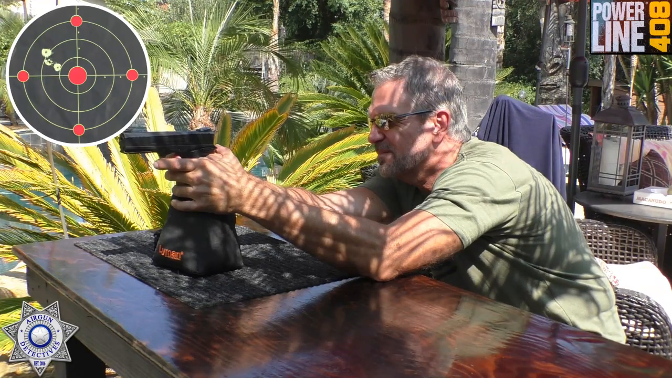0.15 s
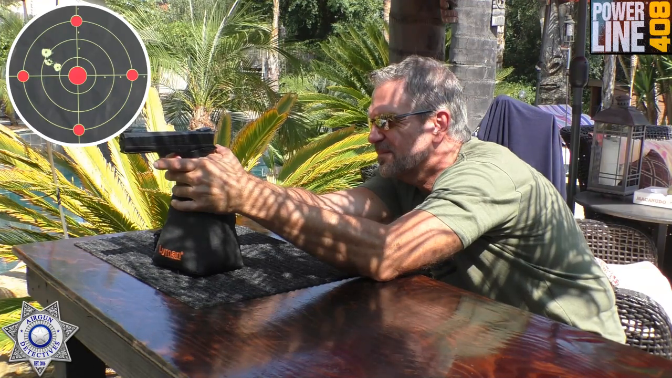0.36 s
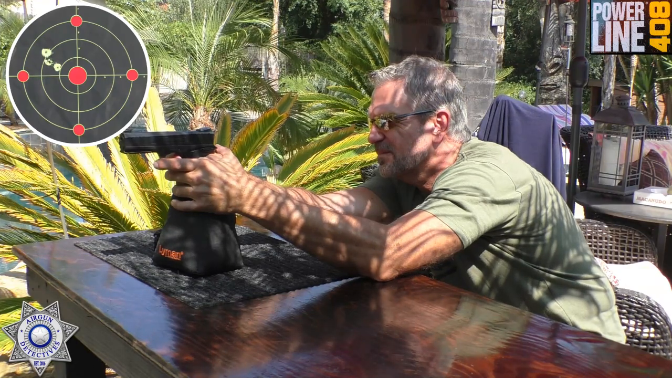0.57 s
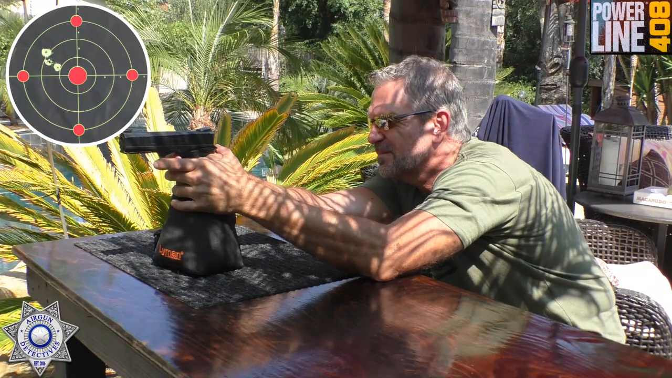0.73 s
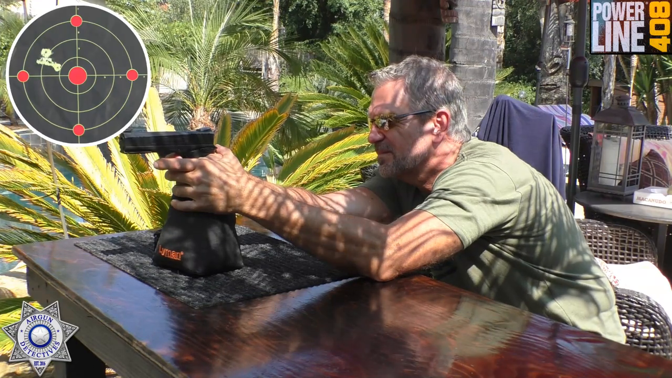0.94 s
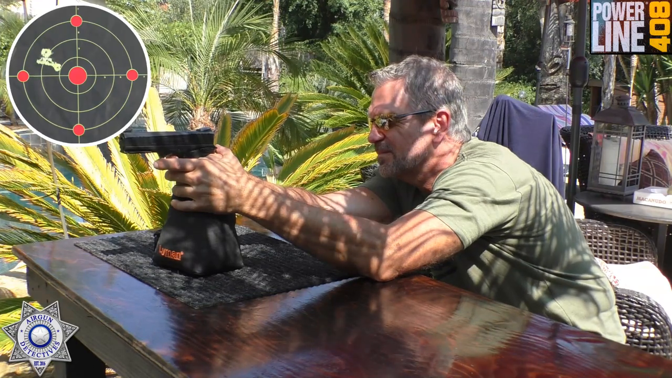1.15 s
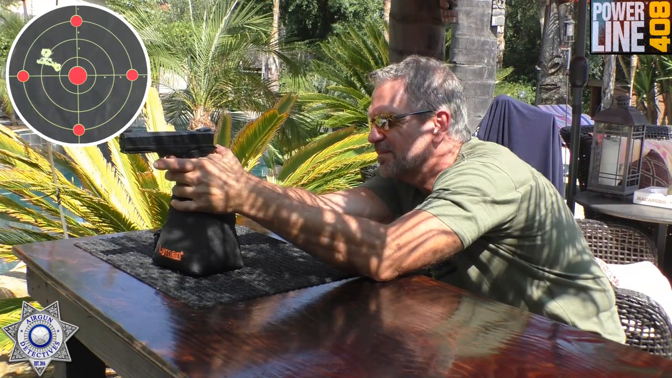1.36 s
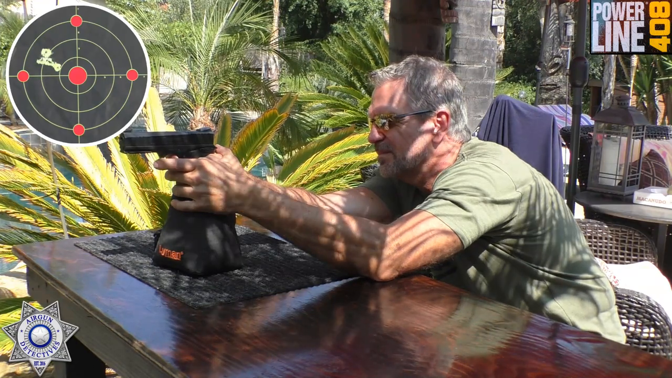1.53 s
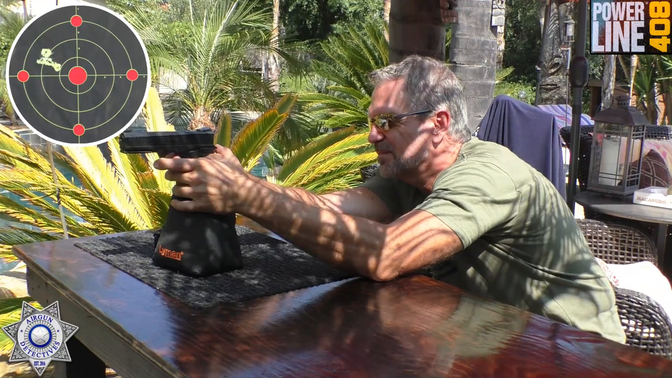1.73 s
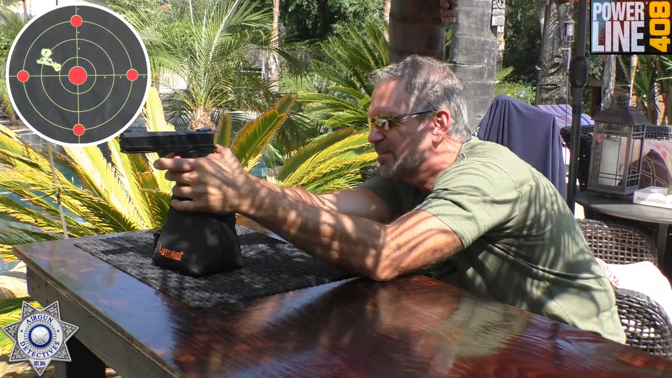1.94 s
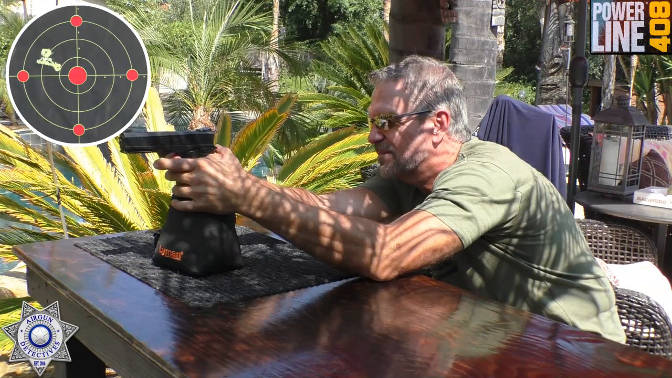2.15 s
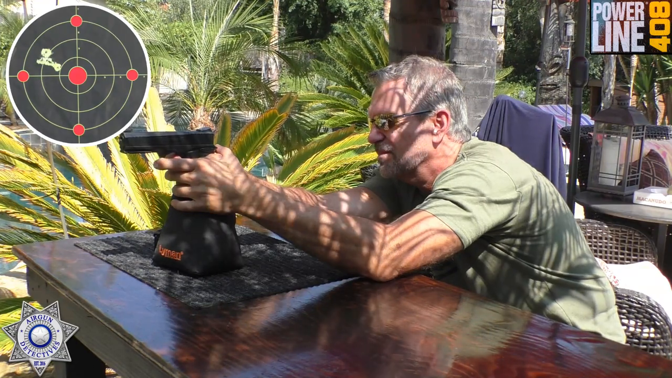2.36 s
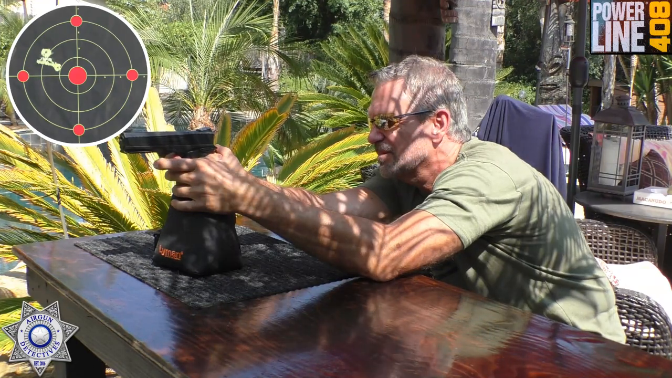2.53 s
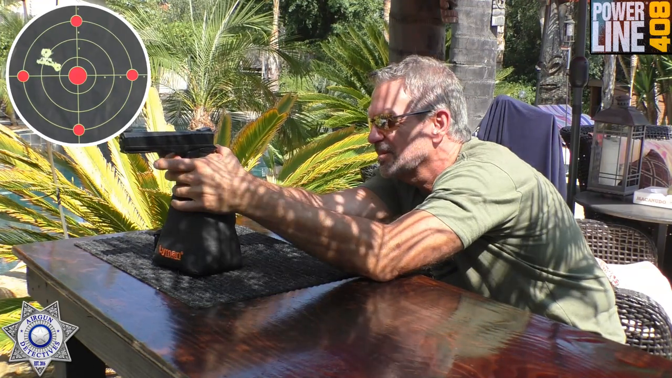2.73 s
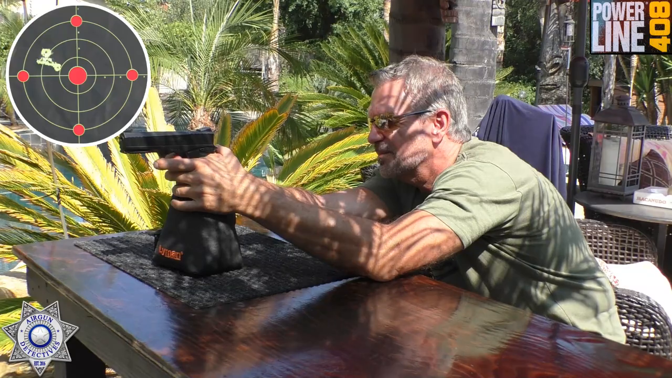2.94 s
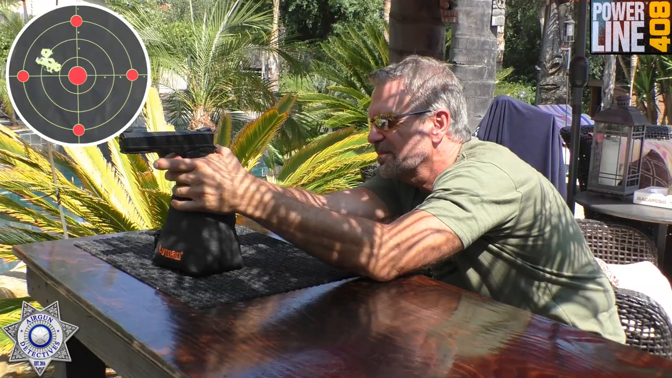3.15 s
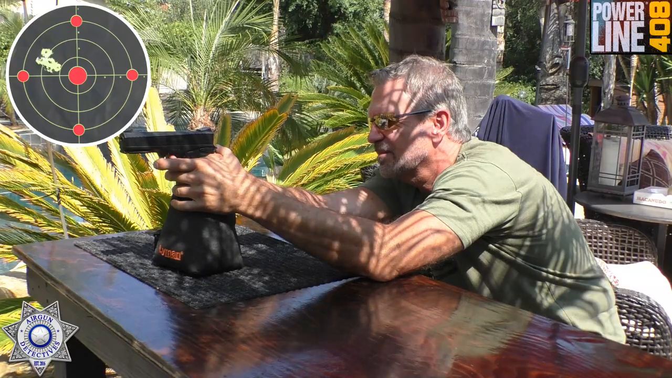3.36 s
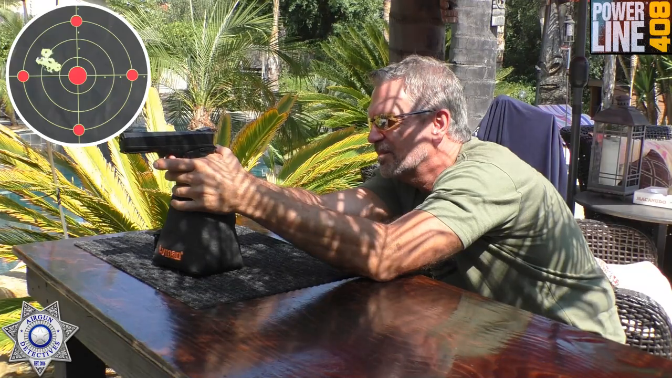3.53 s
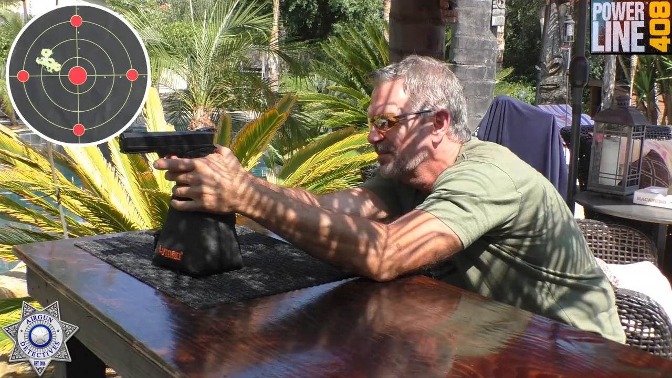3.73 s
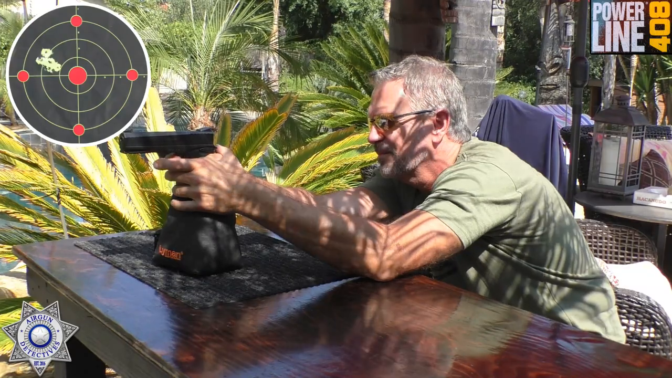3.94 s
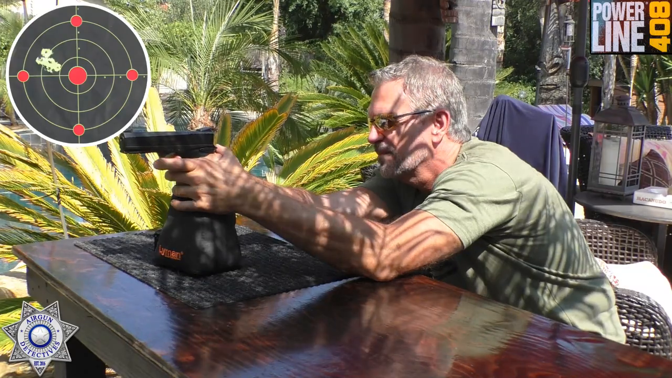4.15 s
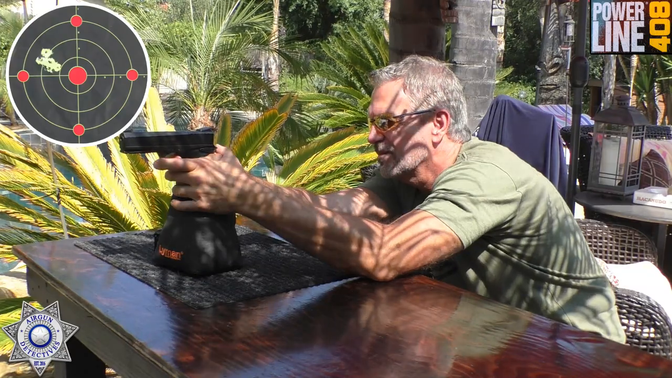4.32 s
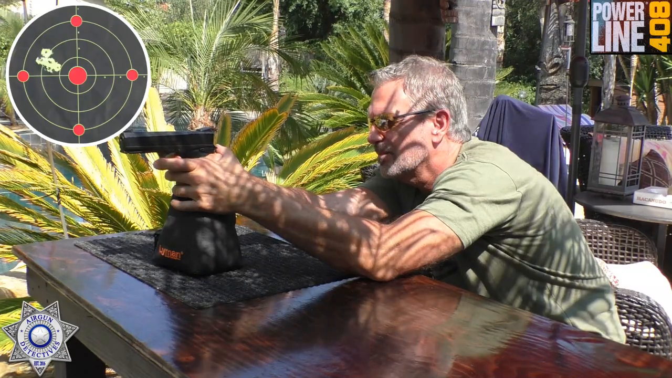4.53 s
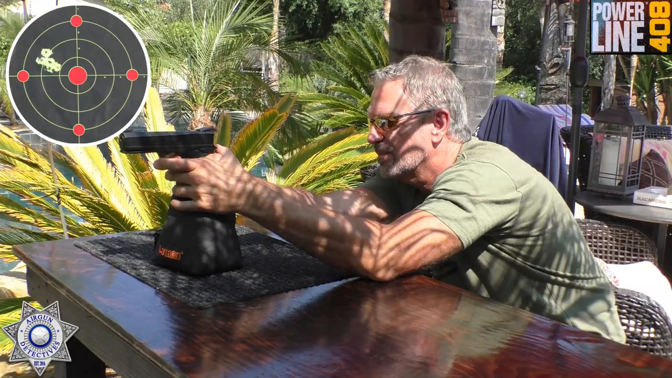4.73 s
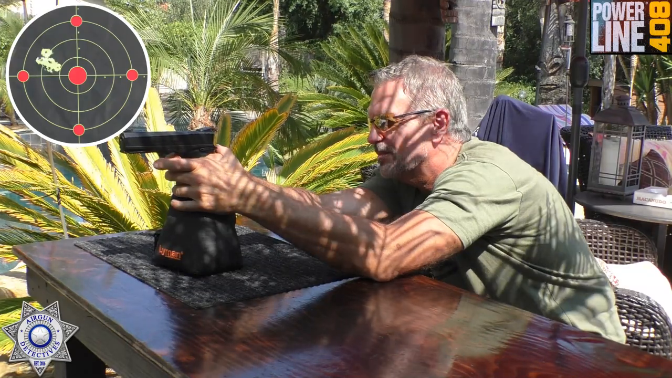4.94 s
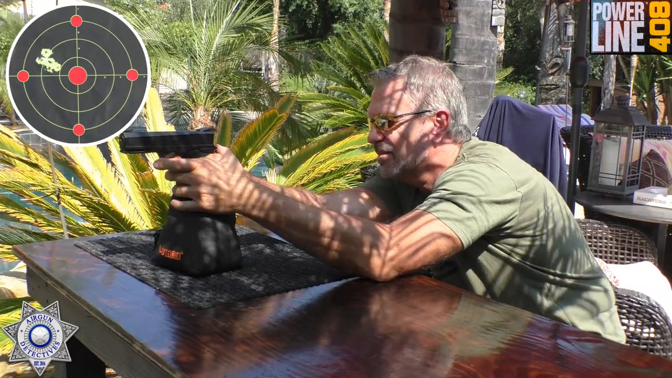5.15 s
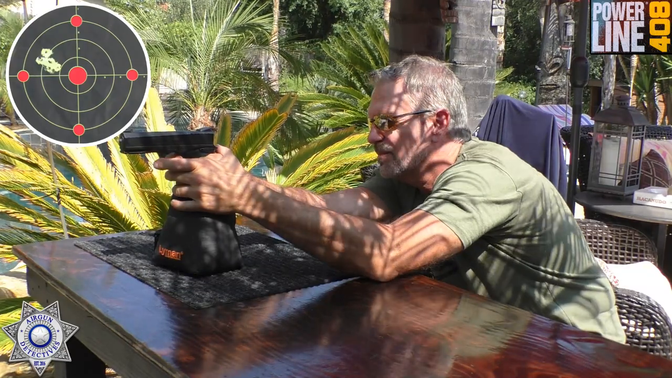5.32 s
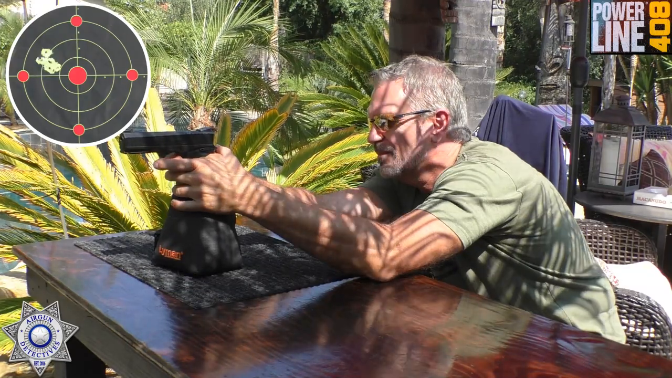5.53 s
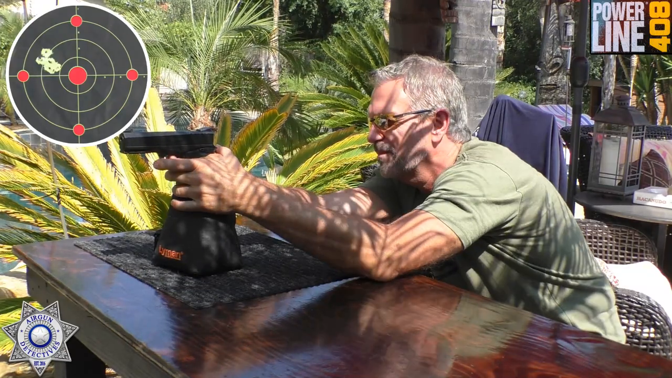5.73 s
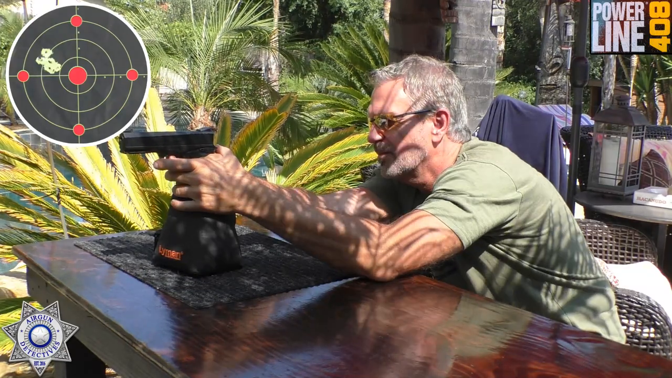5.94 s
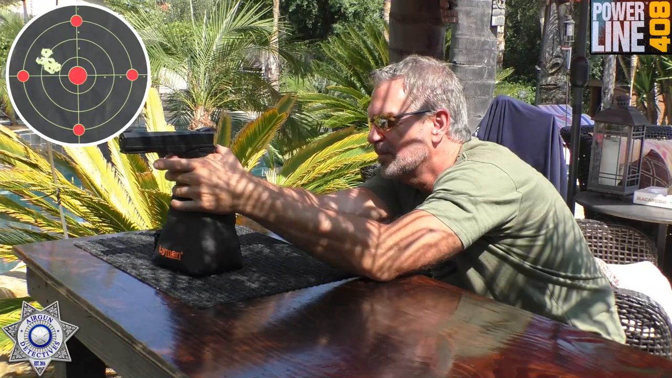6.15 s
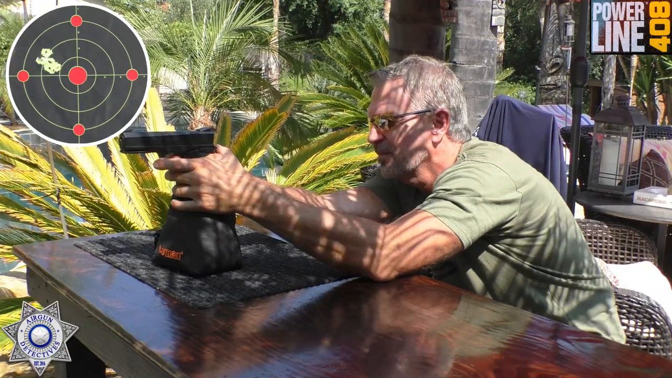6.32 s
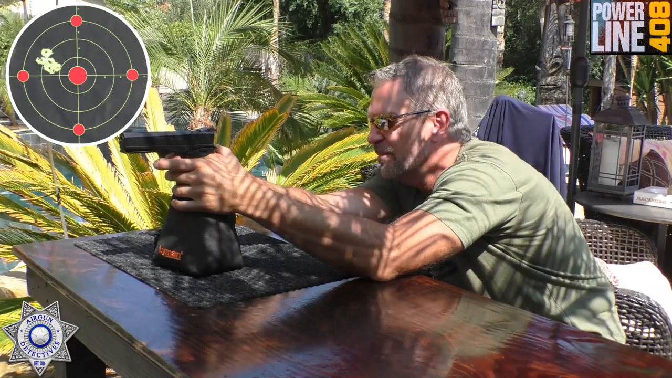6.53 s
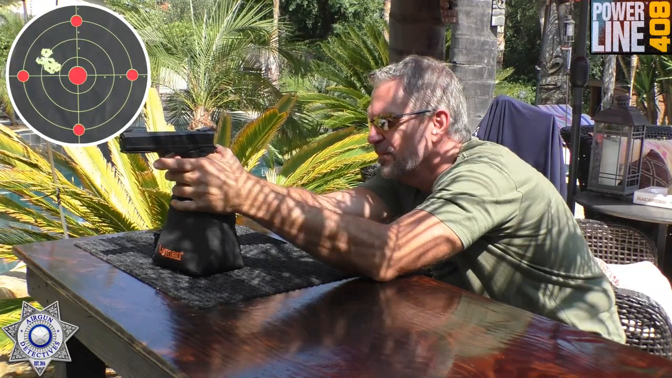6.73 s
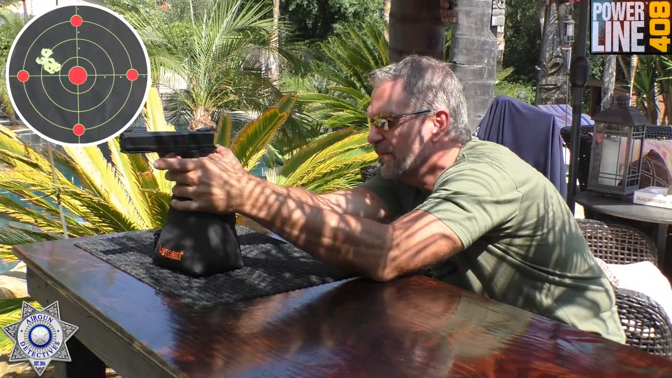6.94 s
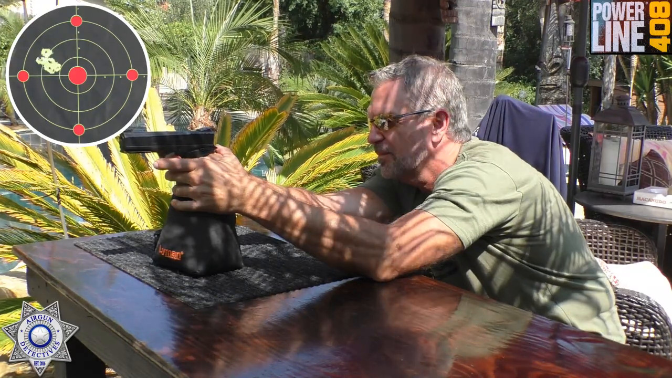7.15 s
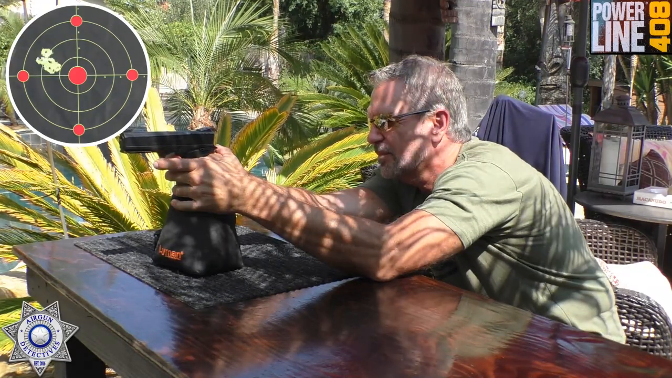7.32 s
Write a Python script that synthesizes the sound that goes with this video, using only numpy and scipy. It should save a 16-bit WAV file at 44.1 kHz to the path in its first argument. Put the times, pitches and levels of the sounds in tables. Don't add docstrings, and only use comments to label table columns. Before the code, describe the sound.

Three slow, sharp air-pistol shots crack across a garden patio, each with slapback echoes, a short tail and small trigger clicks, over rustling leaves.

```python
import sys
import numpy as np
from scipy import signal
from scipy.fft import rfft, irfft, next_fast_len
from scipy.io import wavfile
from scipy.ndimage import uniform_filter1d, map_coordinates

SR = 44100
rng = np.random.default_rng(int(sys.argv[2]) if len(sys.argv) > 2 else 0)


def how_loud(loudness_db):
    steps = np.asarray(loudness_db, float) / 20
    return 10 ** steps


def wav_out(sig):
    wavfile.write(sys.argv[1], SR, np.round(np.clip(np.atleast_2d(sig).T, -1, 1) * 32767).astype(np.int16))


N = 329868
LEFT_RIGHT = np.array([[1], [-1]])


def unit(x):
    return x / np.sqrt(np.mean(x ** 2) + 1e-20)


def along(points, hz):
    f, v = np.transpose(points)
    return np.interp(np.log(hz + 1), np.log(f + 1), v)


def wobble(rate):
    knots = rng.standard_normal(int(N * rate / SR) + 4)
    return map_coordinates(knots, [np.arange(N) * rate / SR])


def filtered(x, response):
    m = next_fast_len(x.shape[-1] + 8192)
    return irfft(rfft(x, m) * response(np.fft.rfftfreq(m, 1 / SR)), m)[..., :x.shape[-1]]


def resonance(f, center, width):
    return 1j * f * width / (center * center - f * f + 1j * f * width)


def resonances(modes):
    return lambda f: sum((-1) ** k * how_loud(db) * resonance(f, c, w) for k, (c, w, db) in enumerate(modes))


def below(top_hz):
    return lambda f: np.clip((top_hz - f) / 120 + .5, 0, 1)


def add(out, s, x):
    part = out[..., round(s * SR):round(s * SR) + x.shape[-1]]
    part += x[..., :part.shape[-1]]


def blip(hz, cycles, t):
    return np.sin(2 * np.pi * hz * t) * np.exp(-hz * t / cycles)


def fade(t, t60_s):
    return how_loud(-60 * t / t60_s)


# pitch_hz, likeness [0-1]
ALIKE = [(40, 0.93), (130, 0.91), (300, 0.71), (650, 0.86), (1400, .75), (3100, 0.55), (7500, 1),
         (15000, 0.45)]


def rush(spectrum, size, patchy_db):
    z = signal.stft(rng.standard_normal((2, size + 512)), nperseg=512)[2]
    field = uniform_filter1d(rng.standard_normal(z.shape[1:]), 8, 0)
    field = uniform_filter1d(field, 6, 1)
    pair = signal.istft(z * how_loud(patchy_db * unit(field)), nperseg=512)[1][:, :size]

    def spread(hz):
        turn = np.arccos(np.clip(along(ALIKE, hz), -1, 1)) / 2
        return how_loud(along(spectrum, hz)) * [np.cos(turn), np.sin(turn)]

    mid, side = filtered(pair, spread)
    return unit(np.array([mid + side, mid - side]))


def answer(spectrum, t60s, clumps_db=1):
    hz, t, z = signal.stft(rush(spectrum, size=SR, patchy_db=-1.5), SR, nperseg=128)
    clumps = how_loud(clumps_db * unit(uniform_filter1d(rng.standard_normal(len(t)), size=5)))
    return signal.istft(z * clumps * fade(t, along(t60s, hz)[:, None]), SR, nperseg=128)[1][:, :SR]


# start_s, blast_db, push_db, push_hz, fence_smear_s
SHOTS = [
    (.8160, -1.5, -18.5, 215, .0004),
    (3.0170, -4, -12, 225, 0.0008),
    (5.3448, -6, -12.5, 290, 0.0044),
]
# delay_s, level_db, pitch_hz
SLAPS = [
    (.0058, -4, 4500),
    (.0073, 1, 8000),
    (.018, -10, 7500),
    (.0348, -9, 2600),
    (.1743, -24, 2200),
    (.083, -17, 5500),
    (.258, -29, 2500),
]
# pitch_hz, width_hz, level_db
MUZZLE = [(1110, 286, -0.5), (2270, 570, 1.5), (4530, 990, -6.5), (6250, 310, 1), (8800, 600, -7),
          (11250, 660, 2.5), (13630, 2300, -19)]


def pistol():
    out, t = np.zeros((2, N)), np.arange(SR // 20) / SR
    for s, blast_db, push_db, push_hz, _ in SHOTS:
        jet = [(hz, width, db + (push_db + 13) * (hz > 5500)) for hz, width, db in MUZZLE]
        gas = rng.standard_normal((4, len(t)))
        hammer = blip(1750, 5, t) + .5 * blip(3600, 6, t) + .2 * gas[0] * fade(t, .03)
        add(out, s - .0046, how_loud(-22) * hammer * (1 - np.exp(-t / .0015)))
        add(out, s - .0031, how_loud(-17.5) * blip(1500, 1.6, t))

        burst = 0.25 * (gas[1] + .5 * LEFT_RIGHT * gas[2]) * fade(t, 0.007) * (t > .00025)
        burst[:, [4, 14]] -= [1.5, 4]
        crack = how_loud(blast_db + 14.5 + 0.61 * LEFT_RIGHT) * filtered(burst, resonances(jet))
        add(out, s, crack)
        add(out, s + .00139, how_loud(-6) * crack[::-1])
        venting = (gas[3] + .4 * LEFT_RIGHT * gas[0]) * fade(t, 0.064)
        hiss = filtered(venting, resonances([(6500, 6500, -6.0), (11400, 1800, 2.5)]))
        add(out, s + 0.0014, 0.41 * how_loud(-1.5) * hiss)

        port_t = np.maximum(t - [[0], [.0004]], 0)
        add(out, s + .0019, how_loud(push_db + 12) * blip(push_hz, .65, port_t))
        add(out, s + 0.0018, .15 * blip(90, 0.396, t))
        add(out, s + .003, .34 * LEFT_RIGHT * blip(90, 0.3, t))

        for delay, db, hz in SLAPS:
            grit = .3 * (delay < .02) * rng.standard_normal(len(t)) * np.exp(-t / .0003)
            add(out, s + delay, how_loud(db + rng.normal(0, 1.2)) * (blip(hz, .9, t) + grit))
    return out


# pitch_hz, level_db [dB per Hz]
NEAR = [(59, -50.5), (100, -17), (239, -5.5), (970, -13), (1280, -7), (1800, -9), (2170, -3), (4470, -8),
        (12100, -5.5), (16000, -15.5)]
# start_s, peak_db
RESET = [
    (1.1684, -22.5),
    (3.3202, -22.5),
    (3.488, -30),
    (5.727, -21.5),
]
# pitch_hz, width_hz, level_db
SEAR = [(1490, 1100, -11), (2550, 1100, -2.5), (4580, 1430, -1), (7000, 1400, -6), (9600, 1930, -4.5),
        (12000, 1700, -5), (15600, 2300, -10.5)]


def sear():
    out, t = np.zeros((2, N)), np.arange(SR // 6) / SR
    for s, db in RESET:
        scrape = rng.standard_normal(len(t)) * fade(t, .012)
        add(out, s, how_loud(db + 3.5 + .5 * LEFT_RIGHT) * filtered(scrape, resonances(SEAR)))
        add(out, s, how_loud(db - 22.0) * answer(NEAR, [(1000, 0.092), (10000, 0.23)]))
    return out


# start_s, peak_db, table_knock_db
STOP = [
    (1.238, -17.5, -21.5),
    (3.4121, -17, -21),
    (5.7958, -16, -23.5),
]
# pitch_hz, width_hz, level_db
FRAME = [(1050, 100, -8.5), (1920, 270, -1.5), (2460, 320, 1.5), (3300, 1100, -9), (4300, 600, -7.5),
         (5550, 640, -7.5), (9700, 810, -8.5), (14080, 1100, -14)]


def trigger():
    out, t = np.zeros((2, N)), np.arange(SR // 6) / SR
    k = np.arange(5)
    delays = .0006 + np.cumsum(np.r_[0, 0.0019 * .85 ** k])
    for s, db, knock_db in STOP:
        blows = 0.11 * rng.standard_normal(len(t)) * fade(t, 0.018)
        blows[np.round(delays * SR).astype(int)] += how_loud(np.r_[2.0, -8 + 0.5 * k])
        add(out, s, how_loud(db + 20.5 + .8 * LEFT_RIGHT) * filtered(blows, resonances(FRAME)))
        knock = (blip(212.3, 3.9, t) + 0.29 * blip(295, 3.36, t)) * (1 - np.exp(-t / 0.002))
        add(out, s + 0.0031, how_loud(db + knock_db + 5.5) * knock)
        add(out, s + 0.001, how_loud(db - 24) * answer(NEAR, [(1000, 0.36), (10000, 0.24)]))
    return out


# pitch_hz, level_db [dB per Hz]
FAR = [(59, -55), (100, -13), (197, -12), (277, -1), (768, -14), (1170, -3.5), (2370, -2), (3050, -3),
       (8830, -5), (12400, -8.5), (16000, -22)]
# pitch_hz, t60_s
NEAR_T60 = [(200, 0.25), (2000, 0.22), (10000, 0.22)]
FENCE_T60 = [(200, 0.2), (2000, 0.15), (10000, 0.11)]
FAR_T60 = [(200, 0.77), (1500, 1), (5000, 0.98), (10000, 0.73), (15000, 0.62)]


def far_echoes():
    out, t = np.zeros((2, N)), np.arange(SR) / SR
    fence_delay_s, garden_end_s, break_db_per_s = .0657, 0.21, 67
    for s, *_, smear in SHOTS:
        start = (1 - np.exp(-t / smear)) * (1 + 1.2 * np.exp(-t / .0005))
        add(out, s + 0.0028, how_loud(-17) * answer(NEAR, NEAR_T60, clumps_db=-1.5))
        add(out, s + fence_delay_s, how_loud(-21.5) * start * answer(NEAR, FENCE_T60, clumps_db=-0.5))
        garden_db = -29 - break_db_per_s * np.clip(t - garden_end_s, 0, 1)
        add(out, s + fence_delay_s, how_loud(garden_db) * start * answer(FAR, FAR_T60, clumps_db=1.3))
    return out


# start_s, level_db, pitch_hz
TWIGS = [(.25, -53, 7000), (.78, -51, 5000), (1.5, -52, 12000), (1.56, -48.5, 5500), (1.982, -55, 7900),
         (2.064, -44, 2300), (2.58, -54, 9000), (4.06, -56.5, 12000), (4.4, -51, 6000), (4.484, -51, 8000),
         (4.725, -46, 4370), (5.02, -51, 6500), (5.222, -44.5, 2900), (6.208, -40, 3380),
         (6.394, -45.5, 3800), (6.885, -46, 3700), (6.97, -49, 11400), (7.08, -50, 6000),
         (7.154, -43, 3600), (7.34, -51, 8800)]


def leaf_ticks():
    out, t = np.zeros((2, N)), np.arange(SR // 40) / SR
    for s, db, hz in TWIGS:
        crackle = rng.standard_normal((2, len(t))) * fade(t, 0.029) * (1 - np.exp(-t / 0.0015))
        tick = filtered(crackle[0] + .3 * crackle, resonances([(hz, 0.47 * hz, 0)]))
        add(out, s, how_loud(db + 9.0) * tick)
    return out


# start_s, length_s, first_hz, last_hz, level_db
BIRDS = [
    (1.36, .16, 6100, 6050, -68),
    (1.55, .08, 6000, 5800, -74),
    (1.62, .12, 15600, 14650, -72),
    (2.385, .26, 5300, 4170, -67.5),
    (4.1, .07, 6000, 5950, -71),
    (4.19, .08, 6050, 6000, -72),
    (6.53, .05, 13000, 11500, -68),
    (6.57, .04, 12600, 11800, -69),
]


def birds():
    out = np.zeros((2, N))
    for s, length, first_hz, last_hz, db in BIRDS:
        u = np.linspace(0, 1, round(length * SR))
        slide = (last_hz - first_hz) * (1 - (1 - u) ** 2.2)
        pitch_hz = first_hz + slide + 20 * wobble(170)[:len(u)]
        swell = np.sin(np.pi * u ** .7) ** .5
        add(out, s, how_loud(db + 3) * swell * np.sin(2 * np.pi * np.cumsum(pitch_hz) / SR))
    return out


# peak_s, length_s, pitch_hz, level_db
REVS = [
    (2.2, .5, 129.5, -57.5),
    (3.75, 1, 123.9, -56),
    (4.151, 0.23, 124, -52.5),
    (4.642, 0.344, 128.3, -50.5),
]


def far_engine():
    t, out = np.arange(N) / SR, np.zeros(N)
    drift = np.cumsum(1.553 * wobble(6.4)) / SR
    flutter_db = 1.4 * wobble(6.1)
    for s, length, hz, db in REVS:
        turn = 2 * np.pi * (hz * t + drift)
        drone = np.sin(turn) + 0.23 * np.sin(2 * turn) + 0.2 * np.sin(3 * turn)
        out += how_loud(db + flutter_db) * np.exp(-np.abs(t - s) / (length / 2)) * drone
    return out


# time_s, level_db
BREEZE = [(0, 0.5), (1.5, 0), (2.6, -1), (3.7, -1), (4.5, -0.25), (5.6, 0.3), (7, 2.5), (7.48, 1.8)]
# pitch_hz, level_db [dB per Hz]
TRAFFIC = [(12, -46), (20, -41), (38, -10.5), (119, -1), (152, -4), (250, -8.5), (400, -12.5), (530, -15.5),
           (700, -23.5), (1000, -54), (1400, -120)]
LEAVES = [(330, -72), (560, -8), (800, -5), (1030, -0.5), (1470, 0.5), (2940, -4), (3560, -6),
          (5000, -16.5), (6500, -45), (11000, -120)]
HISS = [(1500, -120), (2650, -3), (4500, -0.5), (5170, -1), (9510, -1), (15200, -6.5), (15800, -12.5)]


def garden():
    breeze_db = np.interp(np.arange(N) / SR, *np.transpose(BREEZE))
    low = how_loud(-53.6 + 0.19 * wobble(5.1)) * rush(TRAFFIC, size=N, patchy_db=0.9)
    mid = how_loud(-55.5 + breeze_db + 0.51 * wobble(10)) * rush(LEAVES, size=N, patchy_db=0.98)
    high = how_loud(-59.5 + 1.3 * breeze_db + .85 * wobble(25)) * rush(HISS, size=N, patchy_db=.9)
    return low + mid + high


TOP_HZ, EDGE_HZ = 15900, 16470


def scene():
    spread_out = far_echoes() + leaf_ticks() + birds() + far_engine() + garden()
    return pistol() + sear() + trigger() + filtered(spread_out, below(TOP_HZ))


def low_pass(x):
    return signal.sosfilt(signal.butter(12, 16470, fs=SR, output="sos"), x)


# pitch_hz, width_hz, share_removed [0-1]
DIPS = [(592, 124, 0.62), (843, 160, 0.44)]


def record(dry):
    t = np.arange(N) / SR
    after = np.cumsum([.0023, .0007, 0.056, 0.26])  # wait, fall, hold, release [s]
    duck_db = sum(np.interp(t - shot[0], after, [0, -9.5, -9.5, 0]) for shot in SHOTS)
    ducked = dry * how_loud(duck_db)
    clipped = ducked / (1 + np.abs(ducked / .95) ** 4) ** (1 / 4)

    def camera(f):
        body = np.prod([1 - share * resonance(f, c, w) for c, w, share in DIPS], axis=0)
        edge = np.interp(f, [TOP_HZ - 400, TOP_HZ + 200], [1, .45]) * below(EDGE_HZ - 60)(f)
        return body * edge

    return low_pass(filtered(clipped, camera))


dry = scene()
out = record(dry)
wav_out(out)
```